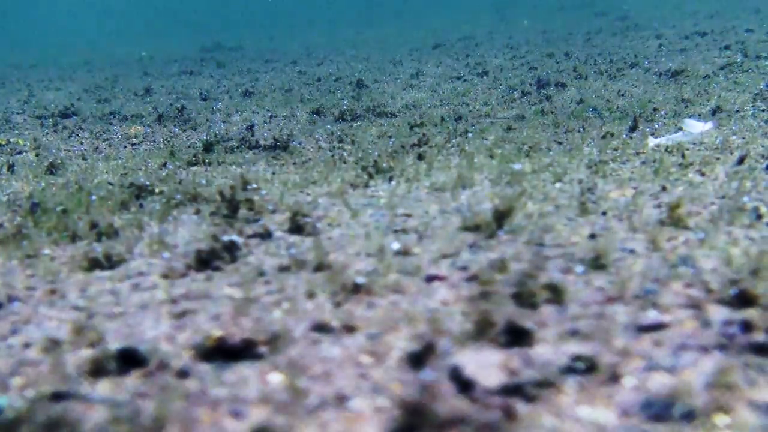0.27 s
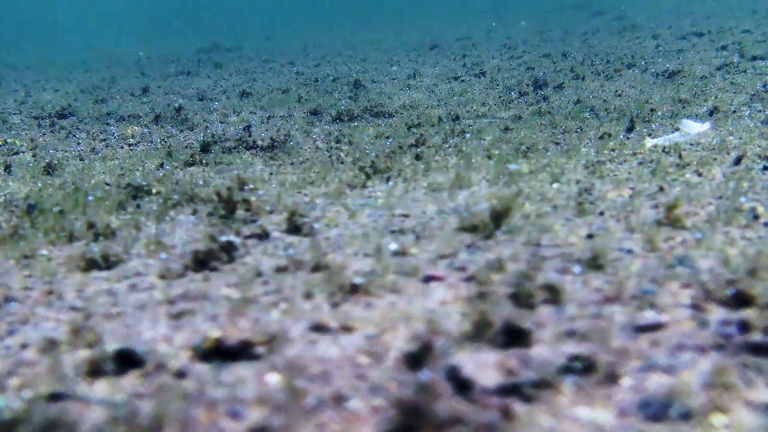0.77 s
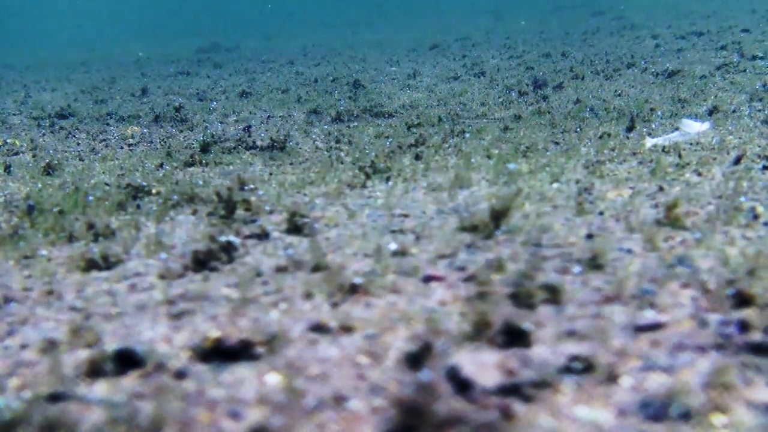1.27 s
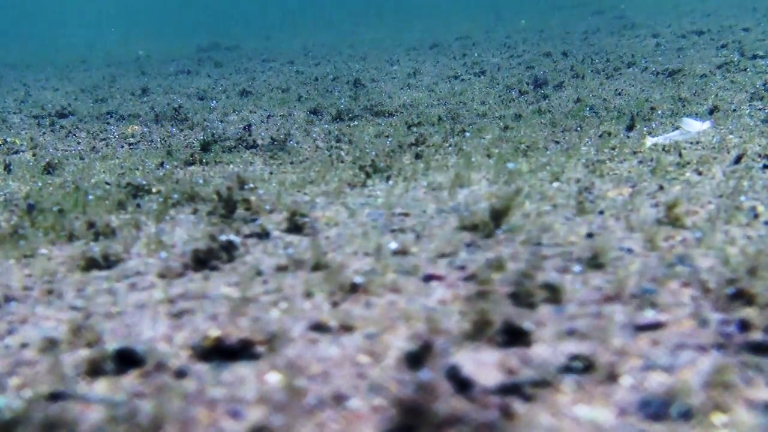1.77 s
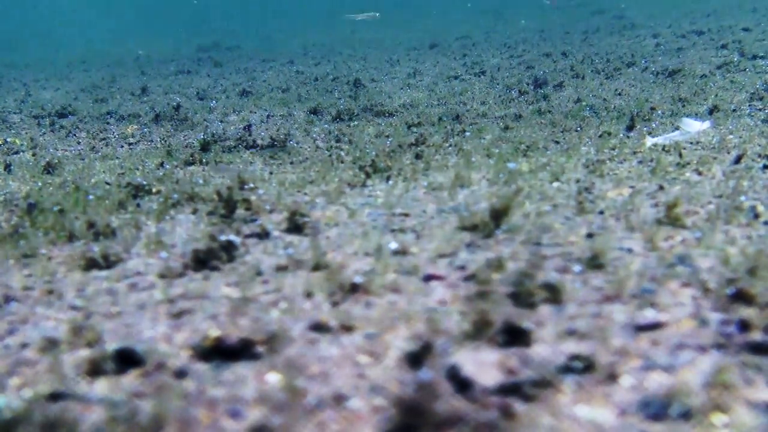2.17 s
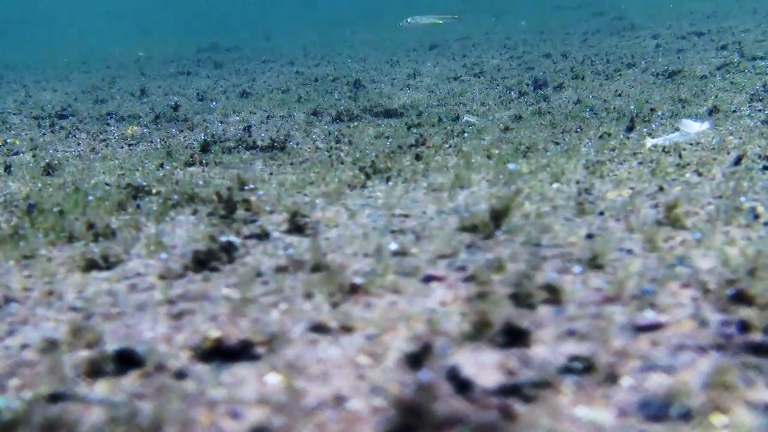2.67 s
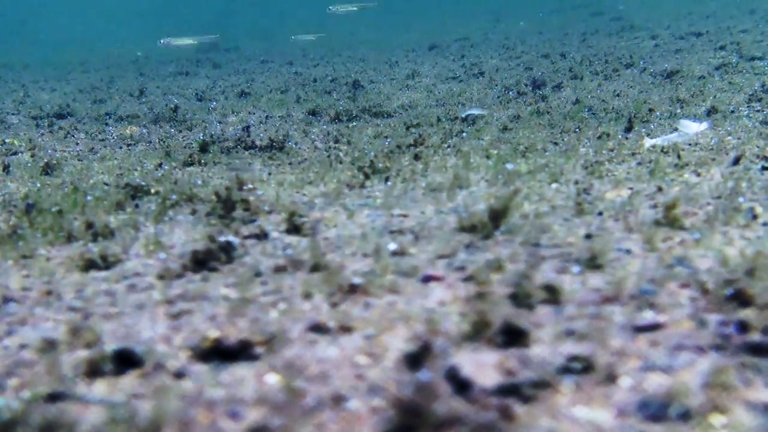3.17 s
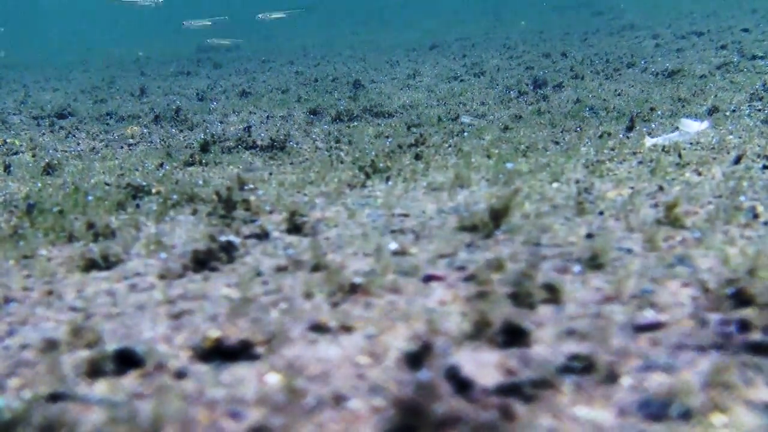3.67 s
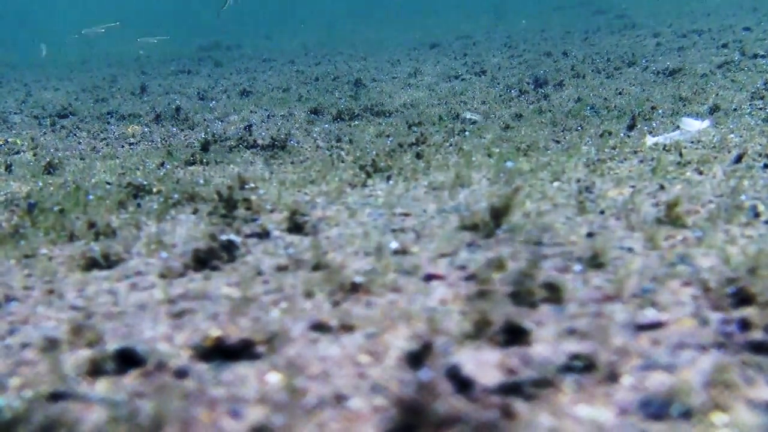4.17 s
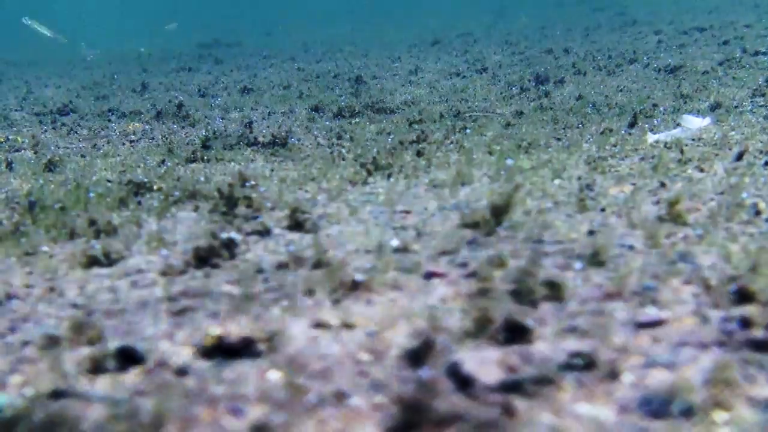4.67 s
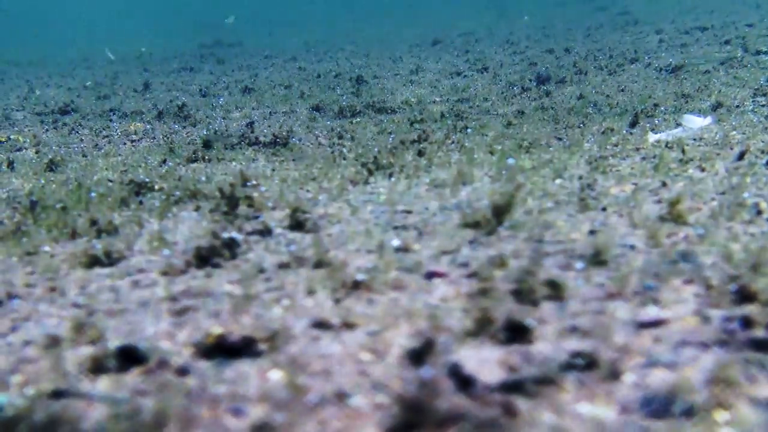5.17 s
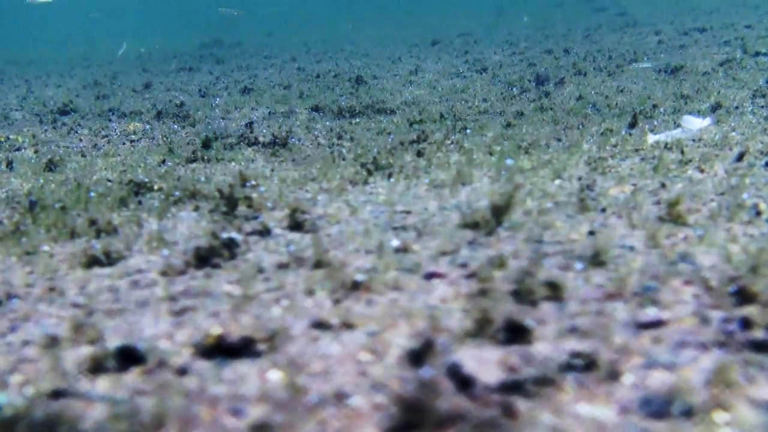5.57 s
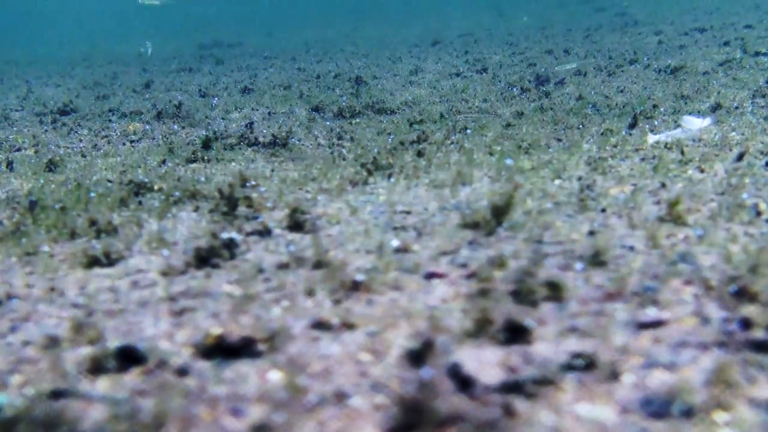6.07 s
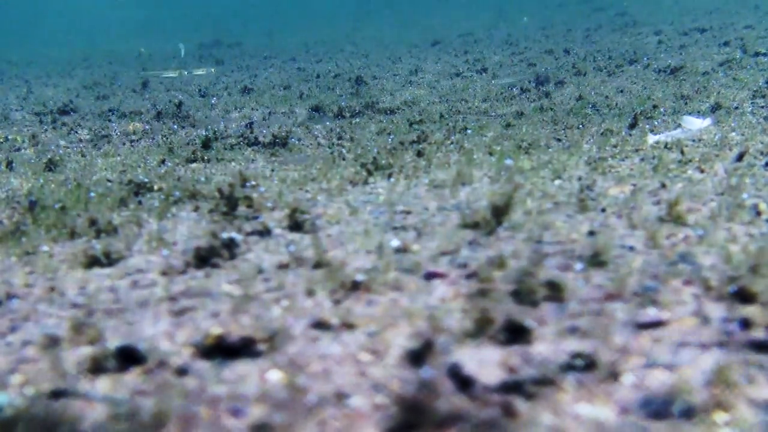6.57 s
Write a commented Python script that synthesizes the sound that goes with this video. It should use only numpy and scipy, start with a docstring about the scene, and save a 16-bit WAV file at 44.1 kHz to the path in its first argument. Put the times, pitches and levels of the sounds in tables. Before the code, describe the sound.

Underwater on a gravelly river bed, the current makes a constant muffled hiss with a boxy, resonant tone. A quick run of soft dull bumps and small gritty ticks against the microphone's case opens the scene. After a gap, another cluster arrives, then a few scattered low thumps, and faint ticks and bumps near the end, while the hiss carries on.

```python
"""A steady, hollow underwater hiss, with soft irregular bumps and now and then a tiny tick.
It is the sound inside a camera's waterproof housing lying on a river bed. The current hisses
through the housing's resonances (the pitches at which it likes to ring). Soft bumps rock
the housing and set its low notes ringing, and grains of grit tick against its wall."""
import sys
import numpy as np
from scipy import signal
from scipy.fft import rfft, irfft
from scipy.io import wavfile

SR = 44100
rng = np.random.default_rng(int(sys.argv[2]) if len(sys.argv) > 2 else 0)


def put_to_file(sound):
    """Save the sound as 16-bit audio at rate SR, in the file named by the first command-line argument."""
    columns = np.atleast_2d(sound).T  # one column per channel
    safe = np.clip(columns, -1, 1)
    whole_steps = np.round(safe * 32767)
    wavfile.write(sys.argv[1], SR, whole_steps.astype(np.int16))


N = 300879


def current(boost_db=0.78):
    """Flowing water makes a broad hiss, which the housing lets through best at its resonances."""
    # resonances of the housing: (pitch [Hz], width to each side [Hz], relative level [dB])
    resonances = [(10, 91, -87.5), (135, 20, -83), (271, 176, -81), (442.4, 102, -77.5), (546, 81, -81),
                  (693, 65, -83), (868, 144, -76.5), (911.5, 22, -74), (1121, 60.5, -76), (1303, 90, -76.0),
                  (1449, 128, -74.5), (1527, 75, -76.5), (1706, 226, -86), (1873, 60, -92.5),
                  (2169, 70, -83.5), (2366, 204, -83), (2586, 116, -84), (2876, 128, -87.5),
                  (3065, 144, -91), (3339, 260, -94), (4127, 320, -106.2), (4757, 364, -101.6),
                  (5320, 340, -111.9), (5889, 220, -110.2)]
    # strength of the current, which swells a little: (time [s], level [dB])
    flow = [(0, -48), (3.1, -48), (3.9, -47), (6.82, -47)]
    power = sum(from_db(db) ** 2 / (1 + ((frequencies() - hz) / width) ** 2) ** 3
                for hz, width, db in resonances)
    return from_db(over_time(flow) + boost_db) * noise(np.sqrt(power))


def bumps(ring_db=1.0, thud_db=-2.5, slow_push_s=0.015, scuff_db=-1.5, scuff_build_s=0.0041):
    """Each soft push rocks the housing with a thud, rings its low notes and adds a short, dull scuff."""
    # pushes: (time [s], strength [dB], contact time [s], tilt from the low note to the upper ones [dB])
    pushes = [(0.11, -40, 0.0039, 6), (0.158, -30.5, .006, 3.5), (0.185, -40, .002, 5),
              (0.372, -38, .002, 2), (0.394, -44.5, .006, -8), (0.483, -37.5, 0.006, 7),
              (0.549, -36.5, 0.0036, 8), (0.575, -38.5, .004, 5), (0.604, -44, .005, 11),
              (0.662, -42, .004, 1), (0.781, -34, 0.0064, -3.5), (0.807, -37, 0.0075, 8),
              (0.882, -48, .004, 13), (0.937, -40, 0.0022, 0.5), (1.329, -32, 0.0071, 4.5),
              (3.130, -35, .008, 1), (3.187, -36.5, .006, 8), (3.196, -28.5, 0.0021, -1.5),
              (3.221, -35, 0.0026, 17), (3.247, -34, 0.0019, 15.5), (3.606, -35.5, 0.005, 1.5),
              (3.890, -45, .006, 6), (4.101, -34, 0.0027, 1), (4.700, -20, 0.023, -6.5),
              (4.863, -38, 0.0041, 4.5), (5.171, -36, .003, -12), (5.180, -27, 0.0026, 2),
              (5.557, -38, .006, -1.5), (6.678, -40, .004, 3.5), (6.698, -43.5, .004, 12),
              (6.724, -41, .004, -1)]
    # the housing rocking on the river bed: (pitch [Hz], level [dB], fade time [s])
    thud_notes = [(66.3, -6, 0.1)]
    # the low note of the resting housing: (pitch [Hz], level [dB], fade time [s])
    low_notes = [(145.8, 0.5, 0.14)]
    # its upper notes: (pitch [Hz], level [dB], fade time [s])
    upper_notes = [(211.8, 2.5, 0.078), (267.4, -8.5, 0.094)]
    pushes = pushes + nudges()
    out, t = np.zeros(N), np.arange(SR // 4) / SR
    scuff_band = signal.butter(2, [170, 580], "band", fs=SR, output="sos")
    scuffs = unit_power(signal.sosfilt(scuff_band, rng.standard_normal((len(pushes), len(t)))))
    for (start_s, strength_db, contact_s, tilt_db), scuff in zip(pushes, scuffs):
        # a longer contact scuffs more and thuds less
        scuff_gain = (1 - np.exp(-contact_s / scuff_build_s)) * from_db(scuff_db + tilt_db / 2)
        thud_gain = from_db(thud_db) / (1 + (contact_s / slow_push_s) ** 4)
        sound = scuff_gain * scuff * swell_and_fade(t, contact_s, fade_s=0.072)
        tilt = from_db(tilt_db / 2)
        for gain, notes in ((thud_gain, thud_notes), (1 / tilt, low_notes), (tilt, upper_notes)):
            for hz, db, fade_s in notes:
                sound += gain * from_db(ring_db + db) * ring(t, hz, contact_s, fade_s)
        add(out, start_s, from_db(strength_db) * sound)
    return out


def grit(rise_s=0.00024):
    """Small, hard grains ring higher than the bumps, and the water quickly stops the ringing."""
    # grains hitting the wall: (time [s], level [dB], pitch [Hz], fade time [s])
    grains = [(0.621, -31, 500, .02), (0.7287, -26, 700, .007), (0.7493, -20, 1480, .005),
              (0.756, -37, 1650, .015), (0.793, -38, 1800, .012), (1.326, -34.5, 730, .02),
              (1.329, -27, 2500, .005), (3.193, -33, 560, .02), (3.202, -29.5, 560, .018),
              (3.2455, -25.5, 570, .016), (6.353, -33, 480, .008), (6.3718, -30.5, 720, .014),
              (6.3789, -29, 540, .009)]
    out, t = np.zeros(N), np.arange(SR // 16) / SR
    for start_s, db, hz, fade_s in grains:
        add(out, start_s, from_db(db) * ring(t, hz, rise_s, fade_s))
    return out


def nudges(count=10, strength_db=-57, spread_db=1.5, contact_s=0.0055):
    """Faint extra pushes at random moments, as rows for the table in bumps()."""
    moments, sizes = rng.uniform(0, N / SR, count), rng.standard_normal(count)
    return [(start_s, strength_db + spread_db * size, contact_s, 0)
            for start_s, size in zip(moments, sizes)]


def microphone_hiss(level_db=-74):
    """The microphone makes a very faint hiss of its own."""
    # tone of that hiss: (frequency [Hz], relative level [dB])
    tone = [(20, -4), (3000, 0), (7000, -0.5), (10000, -2.5), (15000, -5)]
    return from_db(level_db) * noise(from_db(over_frequency(tone)))


def through_wall(sound, low_hz=40, high_hz=2800):
    """The wall keeps out the treble of the contacts, and the slowest part of each push leaks away."""
    return signal.sosfilt(signal.butter(3, [low_hz, high_hz], "band", fs=SR, output="sos"), sound)


def ring(t, hz, rise_s, fade_s):
    """One pure note of a struck object."""
    return np.sin(2 * np.pi * hz * t) * swell_and_fade(t, rise_s, fade_s)


def swell_and_fade(t, rise_s, fade_s):
    """A vibration grows while the contact lasts and dies away by 60 dB in each fade time."""
    return from_db(-60 * t / fade_s) * (1 - np.exp(-t / rise_s))


def noise(gain):
    """Random noise shaped by a gain for each frequency, with an average power of 1."""
    return unit_power(irfft(rfft(rng.standard_normal(N)) * gain, N))


def from_db(db):
    """Turn decibels into a number to multiply by."""
    return 10 ** (np.asarray(db) / 20)


def unit_power(sound):
    """Scale a sound to an average power of 1."""
    return sound / np.sqrt(np.mean(sound ** 2) + 1e-20)


def frequencies():
    """The frequencies that make up the whole sound, in Hz."""
    return np.maximum(np.fft.rfftfreq(N, 1 / SR), 1)


def over_time(points):
    """Join (time, value) points into a curve with a value for every sample."""
    return np.interp(np.arange(N) / SR, *np.transpose(points))


def over_frequency(points):
    """Join (frequency, value) points into a curve, giving each octave equal room."""
    hz, value = np.transpose(points)
    return np.interp(np.log(frequencies()), np.log(hz), value)


def add(out, start_s, sound):
    """Mix a sound in at its start time."""
    at = max(round(start_s * SR), 0)
    out[at:at + len(sound)] += sound[:N - at]


def scene():
    """One sound inside the housing reaches two microphone openings slightly out of step."""
    # the whole sound dips briefly: (time [s], level change [dB])
    dip = [(3.17, 1.5), (3.22, 0.1), (3.5, -0.7), (4.1, 0.5)]
    # how far the left channel trails the right: (frequency [Hz], phase lag [rad])
    left_lag = [(60, 0.01), (250, 0.13), (450, 0.28), (900, 0.41), (1700, 0.44), (2400, 0.38), (3200, 0.36),
                (3800, 0.023)]
    background = microphone_hiss()
    inside = current() + through_wall(bumps() + grit()) + background
    inside *= from_db(over_time(dip))
    lag_share = np.array([[-0.5], [0.5]])   # left half behind, right half ahead
    phase_shift = np.exp(1j * over_frequency(left_lag) * lag_share)
    return irfft(rfft(inside) * phase_shift, N)


def record(dry, cutoff_hz=15700):
    """The very highest treble is cut off steeply."""
    return signal.sosfilt(signal.ellip(12, .1, 70, cutoff_hz, fs=SR, output="sos"), dry)


dry = scene()
out = record(dry)
put_to_file(out)
```